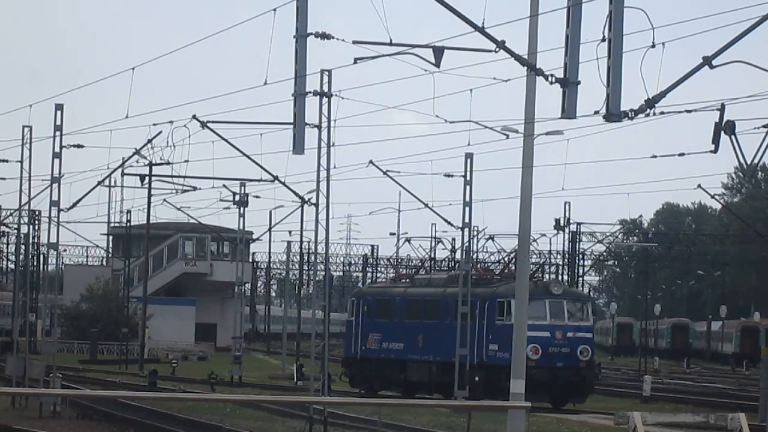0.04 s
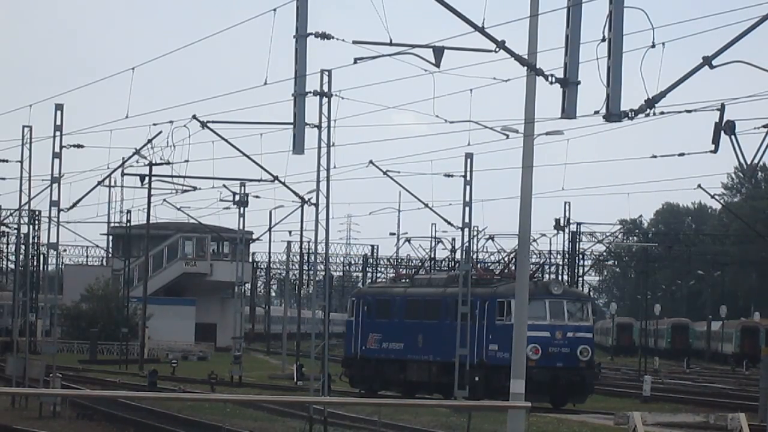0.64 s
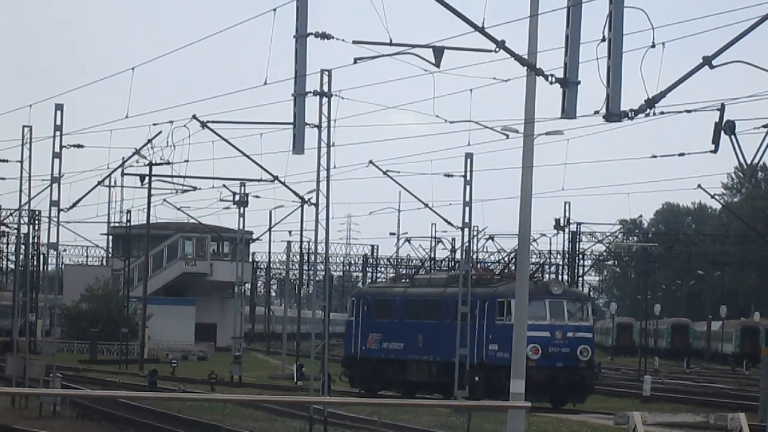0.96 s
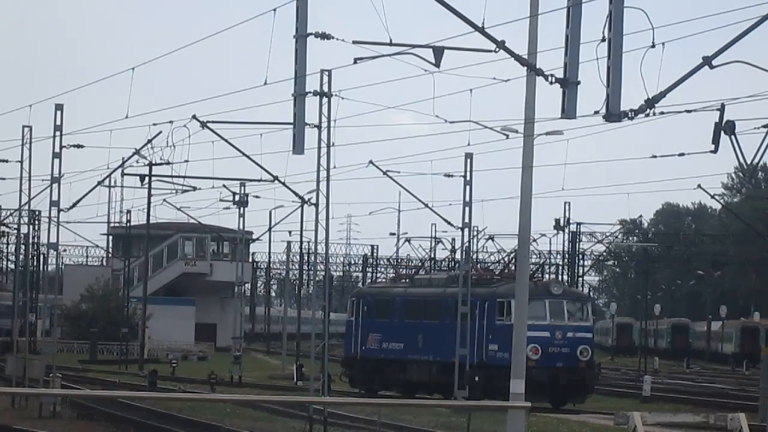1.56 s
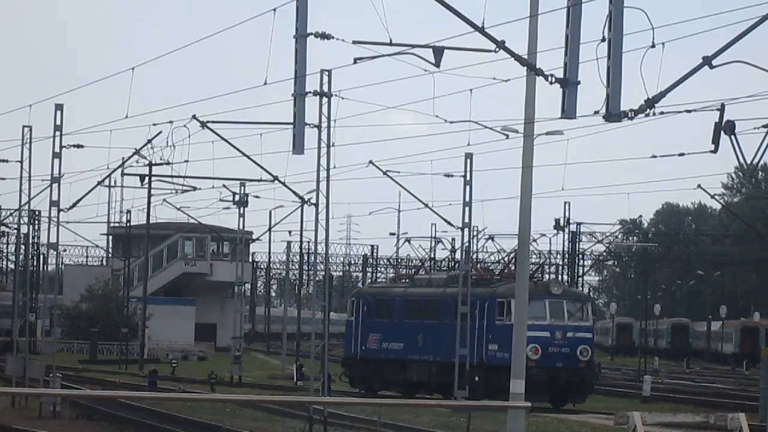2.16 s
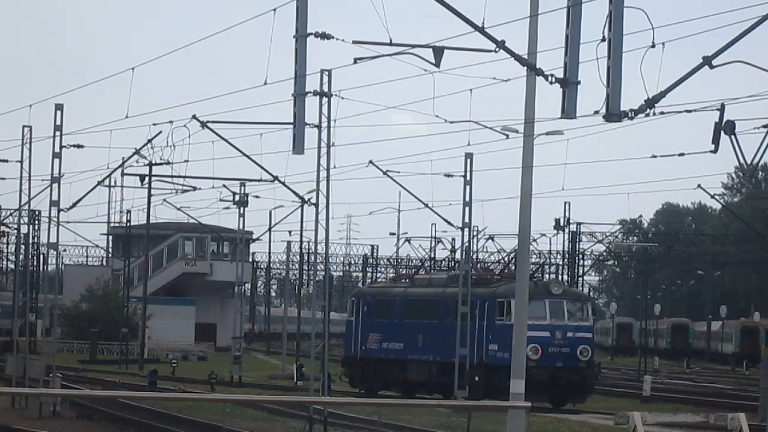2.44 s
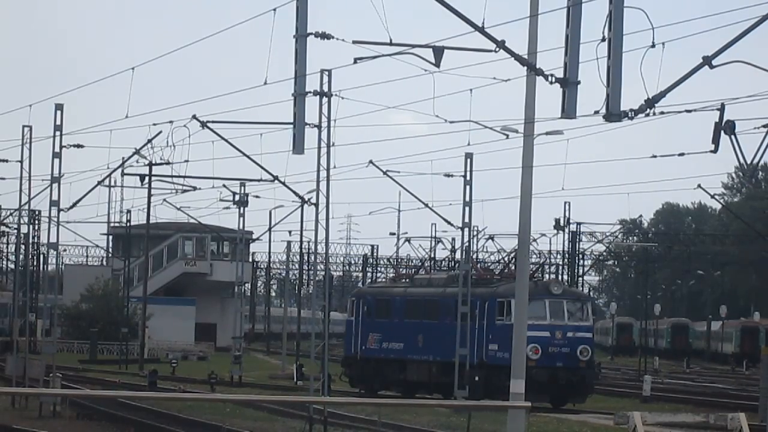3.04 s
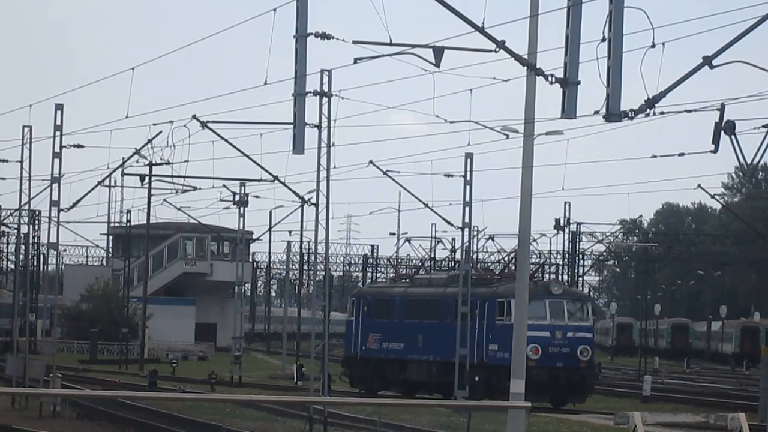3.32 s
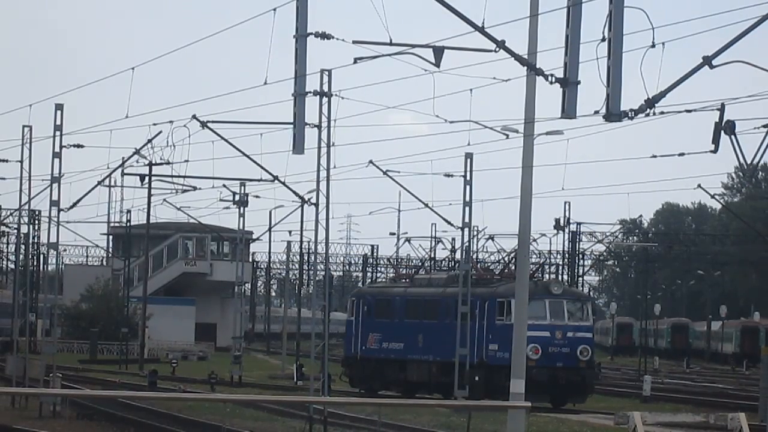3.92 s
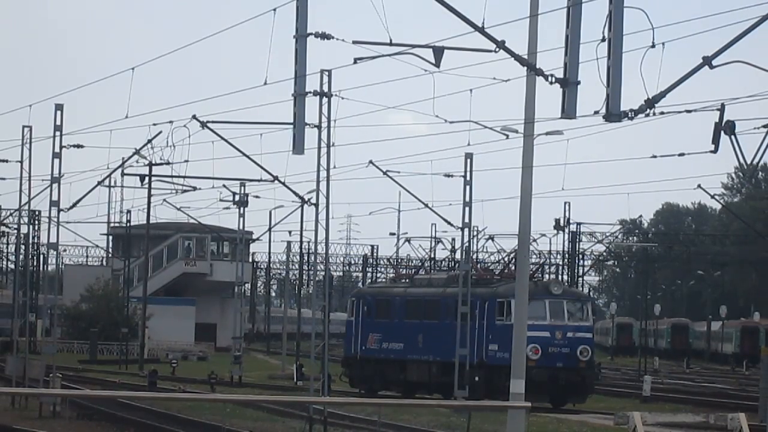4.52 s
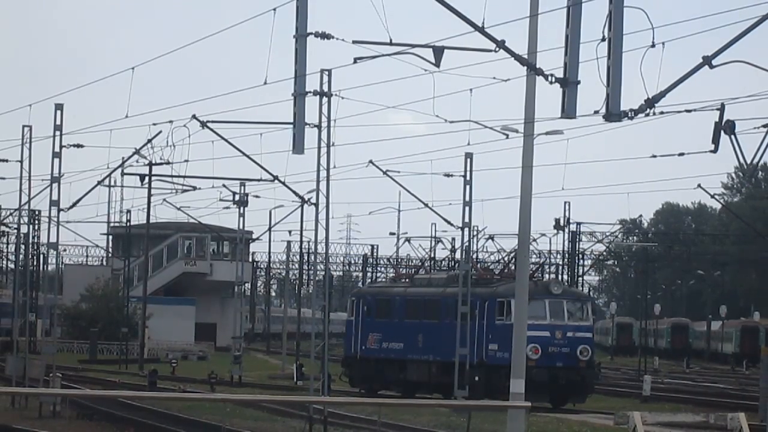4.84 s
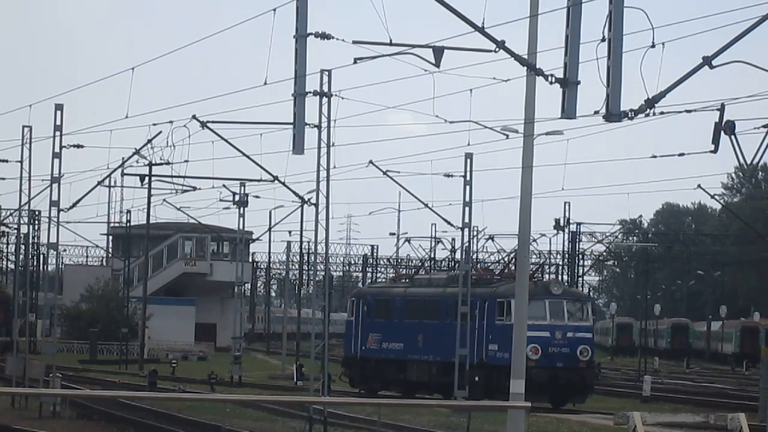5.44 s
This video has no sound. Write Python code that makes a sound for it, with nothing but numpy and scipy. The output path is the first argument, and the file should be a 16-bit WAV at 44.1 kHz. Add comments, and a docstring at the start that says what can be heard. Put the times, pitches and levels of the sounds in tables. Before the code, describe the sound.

An idling electric locomotive's fans drone across a rail yard while gusts rumble on the microphone, hitting hardest near the end.

```python
"""Locomotive fans in a windy yard

An electric locomotive stands some way off in a rail yard, its cooling fans roaring, far trees hissing.
Close up, fingers brush a faintly whining hand-held camera. Gusts buffet its one microphone and eddies
thump on the port; the hardest make the limiter duck everything, and the roar then creeps back."""
import sys
import numpy as np
from scipy import signal
from scipy.fft import rfft, irfft, next_fast_len
from scipy.io import wavfile
from scipy.ndimage import uniform_filter1d, minimum_filter1d, map_coordinates

SR = 44100
rng = np.random.default_rng(int(sys.argv[2]) if len(sys.argv) > 2 else 0)


def file_out(sig):
    """Save sig as 16-bit WAV at sys.argv[1]."""
    # one column per channel
    cols = np.atleast_2d(sig).T
    # limit, then scale
    lim = np.clip(cols, -1, 1)
    pcm = np.round(lim * 32767).astype(np.int16)
    wavfile.write(sys.argv[1], SR, pcm)


N = 250488
TIME = np.arange(N) / SR


def amp(db):
    """Decibels to gain."""
    return 10 ** (np.asarray(db) / 20)


def unit(x):
    """Scale to rms 1."""
    return x / np.sqrt(np.mean(x ** 2) + 1e-20)


def curve(rows):
    """Rows of (t/s, value) to one value per sample."""
    return np.interp(TIME, *np.transpose(rows))


def wobble(rate):
    """A smooth random curve, rate knots a second."""
    return map_coordinates(rng.standard_normal(int(N * rate / SR) + 4), [TIME * rate])


def filtered(x, response):
    """x through a gain that depends on frequency."""
    size = next_fast_len(N + SR // 2)
    return irfft(rfft(x, size) * response(np.fft.rfftfreq(size, 1 / SR)), size)[:N]


def coloured(x, spectrum):
    """x shaped by rows of (f/Hz, level/dB) on a log axis, at rms 1."""
    hz, db = np.transpose(spectrum)
    return unit(filtered(x, lambda f: amp(np.interp(np.log(f + 1), np.log(hz), db))))


def patchy_noise(patchy_db):
    """White noise whose strength drifts in patches of time and frequency."""
    cells = signal.stft(rng.standard_normal(N), nperseg=1024)[2]
    patches = uniform_filter1d(rng.standard_normal(cells.shape), size=7, axis=0)
    patches = uniform_filter1d(patches, size=10, axis=1)
    return signal.istft(cells * amp(patchy_db * unit(patches)), nperseg=1024)[1][:N]


def arch(start, length):
    """An envelope that swells and fades once."""
    return np.sin(np.pi * np.clip((TIME - start) / length, 0, 1))


def tone(hz, drift):
    """A sine of rms 1 whose pitch wanders by the share drift."""
    return np.sqrt(2) * np.sin(2 * np.pi * np.cumsum(hz * (1 + drift * wobble(20))) / SR)


# The fans' roar from across the yard: t/s, level/dB
FAN_LEVEL = [(0, -29.5), (.6, -29), (1.3, -30), (2, -30), (2.7, -30.5), (3.4, -29), (4.1, -30.5),
             (4.9, -32), (5.68, -33)]
# Air rushing through fans and louvres: f/Hz, relative level/dB
FAN_SPECTRUM = [(25, -1), (55, 2.5), (120, -7.5), (200, -7), (430, -6), (700, -10), (1050, -14),
                (1400, -19), (1950, -22), (3000, -31.5), (4500, -40), (6500, -49), (10000, -61),
                (15500, -74)]
# Blade and motor tones: f/Hz, level/dB
FAN_TONES = [(283, -52), (409, -49), (2056, -65)]
def fans(sway_db=-0.07, fade_db=-0.2):
    """Some way off, rushing air and blade tones waver slightly on their way through the wind."""
    air = coloured(patchy_noise(patchy_db=0.87), FAN_SPECTRUM)
    air *= amp(curve(FAN_LEVEL) + sway_db * wobble(6))
    blades = sum(amp(db + fade_db * wobble(1)) * tone(hz, drift=0.004) for hz, db in FAN_TONES)
    return air + blades


# Trees in the distance: t/s, level/dB
LEAF_LEVEL = [(0, -55.5), (.6, -60.5), (1.3, -54), (2.1, -56.5), (2.6, -57.5), (3.3, -52), (4, -55.5),
              (4.6, -55.5), (5.68, -60)]
# Their hiss: f/Hz, relative level/dB
LEAF_SPECTRUM = [(500, -9), (2000, 5.5), (4500, -2.5), (6500, -7.5), (10000, -18), (15500, -29.5)]
def trees(stir_db=0.5):
    """Far foliage hisses softly, swelling and sinking in the breeze."""
    hiss = coloured(patchy_noise(patchy_db=1.0), LEAF_SPECTRUM)
    return hiss * amp(curve(LEAF_LEVEL) + stir_db * wobble(8.5))


# The breeze at the microphone: t/s, level/dB
BREEZE = [(0, -25.5), (.5, -29), (.87, -22.5), (1.15, -26), (2.7, -23.5), (2.97, -27.5), (3.45, -21),
          (4.4, -23.5), (5.5, -33)]
# Gusts riding on it: t/s, length/s, level/dB, nominal eddy f/Hz
GUSTS = [(1.77, .04, -24, 49.6), (1.993, 0.067, -13, 135), (2.23, 0.2, -19.5, 267), (2.46, .14, -22.5, 219),
         (3.19, .11, -22.5, 150), (3.535, 0.165, -15, 170), (3.88, 0.135, -13.5, 150),
         (4.019, .35, -14.5, 155.8), (4.457, 0.34, -14.5, 167), (4.931, .38, -28, 106),
         (5.599, 0.036, -18.5, 145)]
def wind_level(attack_s=0.023, release_s=0.028):
    """Wind strength in dB: each gust builds, holds and dies away, adding its power to the breeze."""
    power = amp(curve(BREEZE)) ** 2
    for start, length, db, _ in GUSTS:
        rise = np.clip((TIME - start) / attack_s + 1, 0, 1)
        fall = np.exp(-np.maximum(TIME - start - length, 0) / release_s)
        power += (amp(db) * rise * fall) ** 2
    return 10 * np.log10(power)


# Deep wind rumble on the microphone: f/Hz, relative level/dB
RUMBLE_SPECTRUM = [(10, -14), (25, -1), (45, 3.5), (85, 0.5), (130, -2), (200, -18), (350, -31.5),
                   (700, -41.5), (1500, -63.5), (4000, -93.5)]
# The faster flutter of a strong gust: f/Hz, relative level/dB
FLUTTER_SPECTRUM = [(40, -8.5), (100, -4), (170, -2.5), (260, -6.5), (370, -17), (600, -31), (1200, -57.5),
                    (4000, -95)]
def turbulence(rumble_db=-2, flutter_db=-6, strong_gust_db=-13, growth=1.415, lump_db=1.5, puff_db=1.65):
    """Wind presses on the port in puffs and lumps; in a gust, flutter grows faster than rumble."""
    level_db = wind_level()
    rumble = amp(level_db + rumble_db) * coloured(rng.standard_normal(N), RUMBLE_SPECTRUM)
    steeper_db = strong_gust_db + growth * (level_db - strong_gust_db)
    flutter = amp(steeper_db + flutter_db) * coloured(rng.standard_normal(N), FLUTTER_SPECTRUM)
    unevenness = unit(amp(lump_db * wobble(45) + puff_db * wobble(12)))
    return unevenness * (rumble + flutter)


# The camera's whine, right by the microphone: t/s, level/dB
WHINE_LEVEL = [(0, -81), (2.5, -68), (4.6, -69.5), (5.3, -61.5), (5.68, -62)]
def whine(hz=2989):
    """A thin whistle of steady pitch from inside the camera."""
    return amp(curve(WHINE_LEVEL)) * tone(hz, drift=0.00018)


# Brief tones far off in the yard: t/s, length/s, f/Hz, level/dB
FAR_TONES = [(0.206, 0.1, 930, -40), (0.316, 0.19, 621, -34.5)]
def far_tones():
    """Two distant, wavering tones show faintly through the roar."""
    return sum(amp(db) * arch(s, length) * tone(hz, drift=0.012) for s, length, hz, db in FAR_TONES)


# Fingers on the camera body, close to the microphone: t/s, length/s, level/dB
RUSTLES = [(0.301, 0.013, -53.5), (1.202, 0.042, -53), (1.631, 0.05, -48.5), (1.676, 0.029, -48.5),
           (2.218, 0.021, -57.5), (2.8007, 0.0013, -40), (2.8073, 0.0017, -41), (2.829, 0.0095, -54),
           (3.182, 0.035, -53.5)]
# The brushed casing: f/Hz, relative level/dB
CASING_SPECTRUM = [(800, -21), (3000, 2), (5300, 3), (7500, -5), (11000, -11), (15500, -22)]
def handling(grain_db=2):
    """Fingers slip on the casing in short, grainy rustles; the shortest are ticks."""
    strokes = sum(amp(db) * arch(s, length) for s, length, db in RUSTLES)
    friction = rng.standard_normal(N) * amp(grain_db * wobble(600))
    return strokes * coloured(friction, CASING_SPECTRUM)


# Fine whirls rasping on the microphone port: f/Hz, relative level/dB
RASP_SPECTRUM = [(150, -19), (400, 7.5), (650, 4), (1000, -12.5), (1450, -19), (1900, -43.5), (4000, -82.5)]
def eddies(rows, width, order, rasp_s=0.0047, rasp_trim_db=-1.0):
    """Each eddy is one swing of pressure, rounder at a higher order; its finer whirls rasp on the port."""
    whirls = coloured(rng.standard_normal(N), RASP_SPECTRUM)
    pressure = np.zeros(N)
    for (s, db, hz, rasp_db), phase in zip(rows, rng.uniform(0, 2 * np.pi, len(rows))):
        near = np.abs(TIME - s) < 0.05
        t = TIME[near] - s
        # a passing vortex pushes, sucks or does both in turn, depending on its path
        swing = np.real(np.exp(1j * phase) / (1 - 1j * t * hz / width) ** order)
        rasp = whirls[near] * np.exp(-(t / rasp_s) ** 2)
        pressure[near] += amp(db) * swing / np.abs(swing).max() + amp(rasp_db + rasp_trim_db) * rasp
    return pressure


# Big eddies right on the microphone: t/s, peak level/dB, nominal f/Hz, rasp level/dB before trim
THUMPS = [(.873, -13.5, 138, -48), (1.298, -6, 119, -34), (1.437, -10, 97, -44), (2.025, -4, 233, -25),
          (2.068, 3.5, 151, -38), (2.168, -4, 210, -33), (2.226, -5, 149, -32), (2.295, -3.5, 163, -17),
          (2.337, -5.5, 220, -22), (2.364, .5, 201, -19), (2.382, -2.5, 229, -15.5),
          (2.469, -5, 222, -22.5), (2.546, -1, 152, -26), (2.626, -5.5, 213, -38), (3.214, -7, 119, -42),
          (3.289, -8, 174, -37), (3.549, -2, 199, -36.5), (3.568, 7, 163, -25), (3.643, 2.5, 89.7, -44),
          (3.673, 1, 158, -26), (3.71, 1, 109.8, -46), (3.882, 6, 105, -40), (3.969, 9.5, 218, -27.5),
          (3.976, 10, 120, -7.5), (4.104, .5, 219.6, -32), (4.151, 5.5, 170, -15.5), (4.529, 0, 115, -46),
          (4.584, -1.5, 166.1, -22.5), (4.652, 1.5, 131, -41), (4.719, 1, 170, -23),
          (4.743, 14, 125, -23.5), (5.014, -11.5, 89, -52), (5.515, -8, 120, -47)]
def thumps():
    """Single big eddies strike the port, each with a sharp swing of pressure."""
    return eddies(THUMPS, width=0.42, order=3)


def small_eddies(per_s=36, over_gust_db=7, scatter_db=4.5, scatter_octaves=0.5, max_per_gust=40,
                 rasp_db=-35, rasp_ref_hz=161, rasp_db_per_octave=20):
    """Each gust sheds an uneven train of rounder eddies across the port; quicker ones rasp more."""
    rows = []
    for start, length, gust_db, gust_hz in GUSTS:
        delay, strength, quickness = rng.uniform(-1, 1, (max_per_gust, 3)).T
        s = start + (np.arange(max_per_gust) + (1 + delay) / 2) / per_s
        db = gust_db + over_gust_db + scatter_db * strength
        hz = gust_hz * 2 ** (scatter_octaves * quickness)
        whirl_db = db + rasp_db + rasp_db_per_octave * np.log2(hz / rasp_ref_hz)
        rows += list(np.column_stack([s, db, hz, whirl_db])[s < start + length])
    return eddies(rows, width=0.81, order=6)


def limiter(x, release_s=0.7):
    """The gain drops almost at once to hold a peak at full scale, with a faint snap, and recovers slowly."""
    excess_db = np.maximum(20 * np.log10(np.abs(x) + 1e-9), 0)
    peak_db = -minimum_filter1d(-excess_db, size=5)
    recovery = np.exp(-TIME / release_s)
    duck_db = np.maximum.accumulate(peak_db / recovery) * recovery
    return x * amp(-uniform_filter1d(duck_db, size=5))


def scene():
    """At the one microphone: the yard at a distance, the camera close by, the wind on the port."""
    yard = fans() + trees() + far_tones()
    camera = handling() + whine()
    wind = turbulence() + thumps() + small_eddies()
    return (yard + camera + wind)[None]


def record(dry):
    """The camera cuts two narrow notches, limits the peaks and passes nothing above its band limit."""
    notches_hz, half_width_hz, top_hz = (3955, 7910), 45, 15720

    def notches(f):
        return np.prod([1 - 1 / (1 + ((f - hz) / half_width_hz) ** 2) for hz in notches_hz], axis=0)

    limited = limiter(filtered(dry[0], notches))
    return filtered(limited, lambda f: f < top_hz)[None]


dry = scene()
out = record(dry)
file_out(out)
```